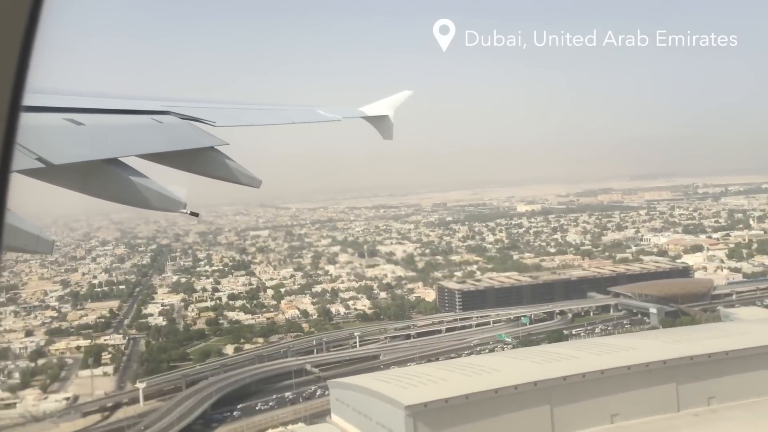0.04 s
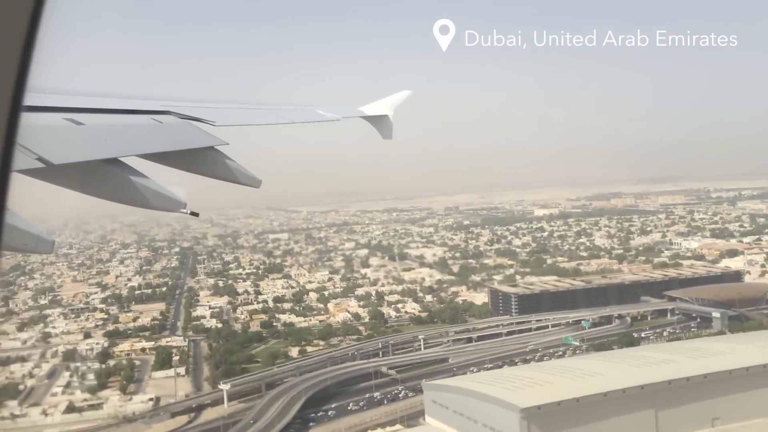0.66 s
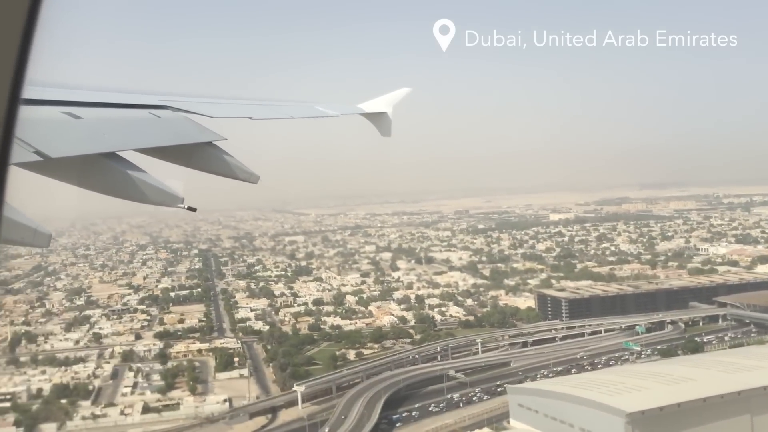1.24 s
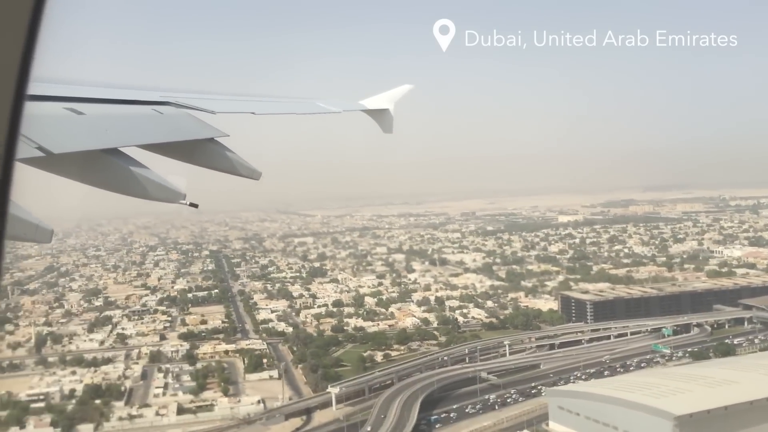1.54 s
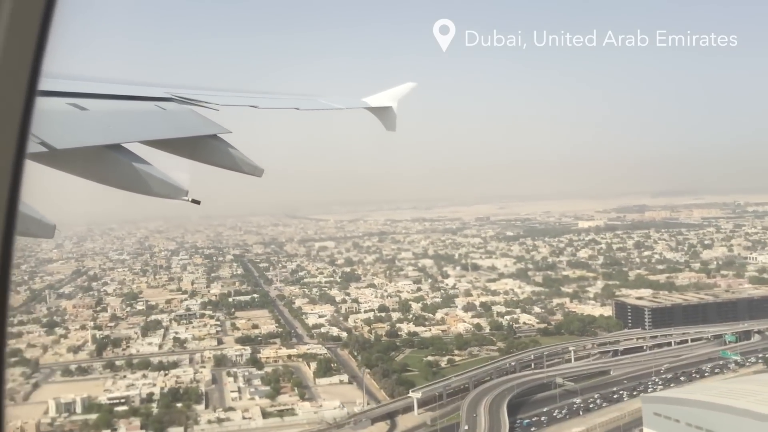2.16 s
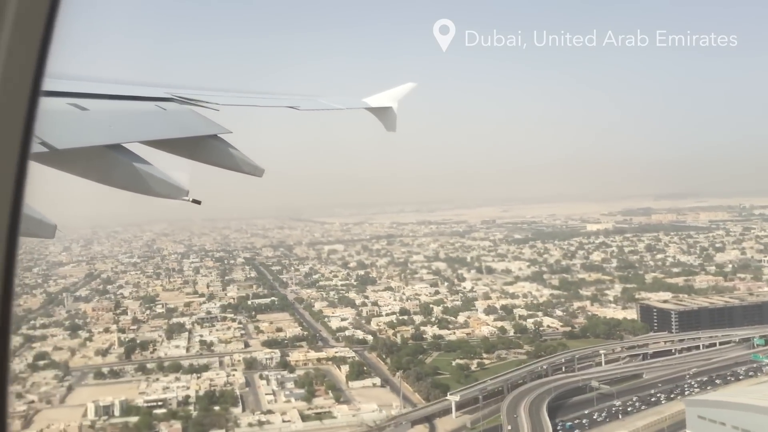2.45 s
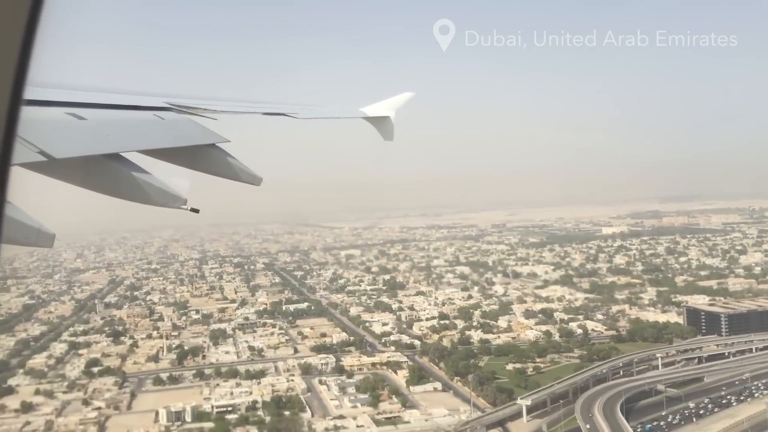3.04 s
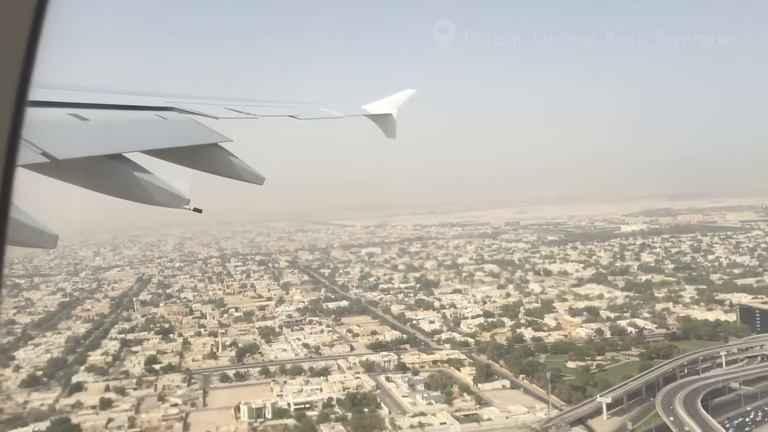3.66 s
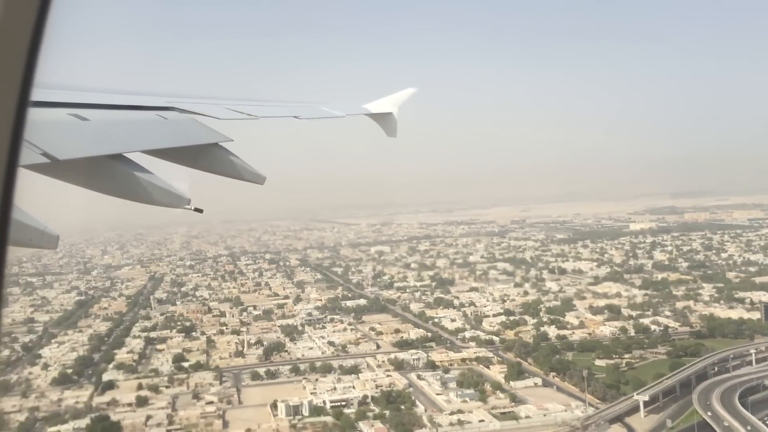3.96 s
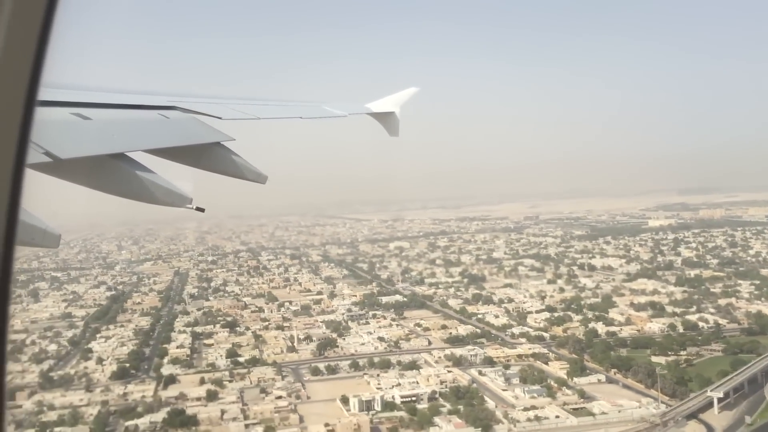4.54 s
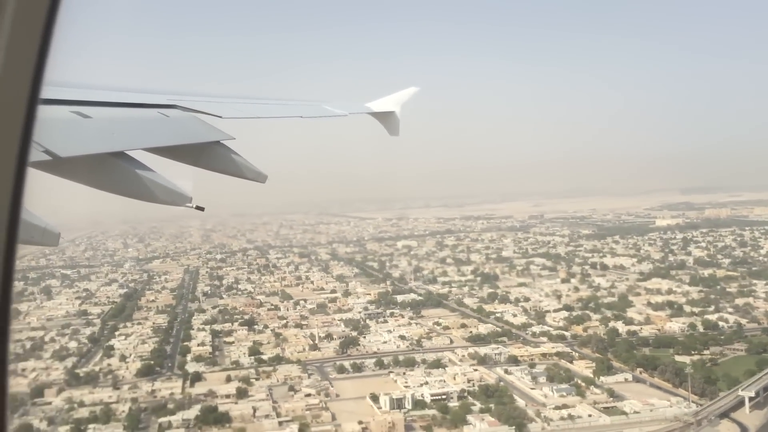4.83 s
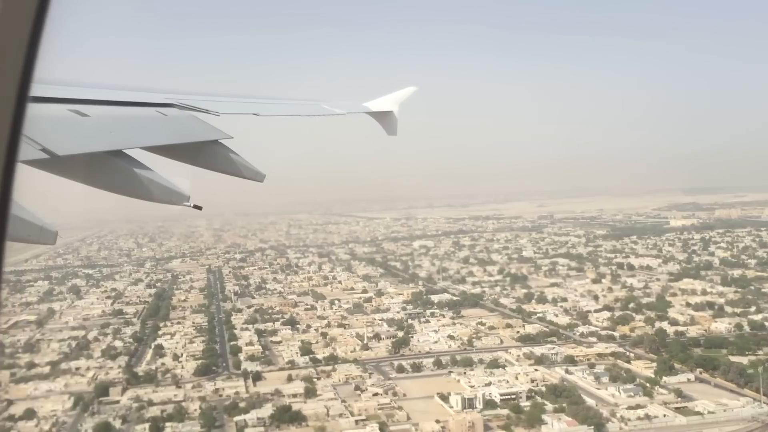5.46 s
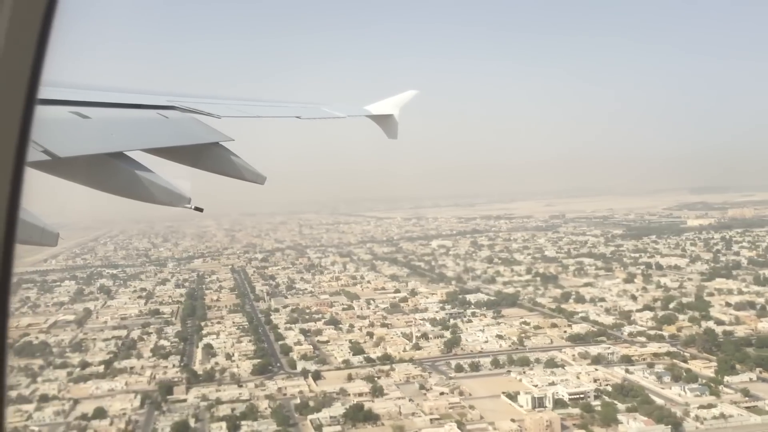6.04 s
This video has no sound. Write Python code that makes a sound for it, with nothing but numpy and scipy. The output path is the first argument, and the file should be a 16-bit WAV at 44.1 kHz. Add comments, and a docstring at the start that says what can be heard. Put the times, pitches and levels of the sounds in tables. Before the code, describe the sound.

Two heavy landing gear thuds, the second harder, break the low drone and soft airflow hiss inside a climbing airliner.

```python
"""Inside an airliner climbing away after take-off, at a window seat.
From the start, engines and airflow lay a bed of hull rumble and hiss under a faint wavering whine,
and a loose panel chirps as it rocks. Small things rustle; from 1.5 s, trim rattles and plastic
fittings knock. At 2.2 s the landing gear thuds below the floor and shakes the trim.
A second, harder thud lands at 4.8 s, and the whine pushes forward at the end."""
import sys
import numpy as np
from scipy import signal
from scipy.fft import rfft, irfft
from scipy.io import wavfile
from scipy.ndimage import uniform_filter1d

SR = 44100
rng = np.random.default_rng(int(sys.argv[2]) if len(sys.argv) > 2 else 0)


def transcribe(u):
    """Save the signal u as a 16-bit wav file named by the first command-line argument.

    u: samples, shape (n,) or (channels, n), limited to [-1, 1]; the rate is SR.
    q: integer samples, one column per channel.
    """
    v = np.clip(np.atleast_2d(u).T, -1, 1)
    q = np.round(v * 32767).astype(np.int16)
    wavfile.write(sys.argv[1], SR, q)


N = 277389
TIME = np.arange(N) / SR

# tone of the hull rumble: (frequency [Hz], relative level [dB])
RUMBLE_EQ = [(16, -28), (30, -21.5), (45, -8.5), (62, 0.5), (75, 2), (90, -0.5), (120, -6.5), (160, -8.5),
             (225, -11.5), (290, -21.5), (360, -25), (450, -38.5), (700, -83)]
# jolts of turbulence, each a short swell of the rumble: (time [s], length [s], lift [dB])
JOLTS = [(0.34, .1, 2), (1.017, 0.22, 1.5), (1.814, 0.023, 6), (2.13, .05, 4.5), (2.548, 0.085, 2.5),
         (3.377, 0.28, 1.5), (4.623, 0.046, 4), (5.47, 0.066, 3.5), (5.846, 0.046, 4.5)]
# tone of the rushing air: (frequency [Hz], relative level [dB])
AIR_EQ = [(250, -13.5), (480, 2.5), (720, -1), (1100, -10), (1650, -8), (2150, -17), (2700, -15.5),
          (3050, -25), (3750, -25.5), (4400, -33.5), (4900, -37.5), (6200, -36.5), (10500, -46),
          (12700, -47), (15200, -52.5)]
# path of the engine whine: (time [s], pitch [Hz], level [dB])
WHINE_PATH = [(0, 830, -66), (.4, 825.3, -61.5), (1.1, 835.3, -64), (1.8, 829, -59), (2.6, 832.7, -63.5),
              (3.7, 836, -62.5), (4.05, 825.6, -53.5), (4.27, 826, -65), (4.5, 817.6, -54.5),
              (5.1, 826, -63.5), (5.98, 831, -57.5), (6.12, 835, -53), (6.29, 832, -51.5)]
# faint machine hums: (pitch [Hz], level [dB])
MACHINE_TONES = [(101, -41), (1821, -73)]
# how hard and how high the loose panel squeals: (time [s], relative level [dB], pitch [Hz])
SQUEAL_PATH = [(.06, -69, 6380), (.38, -65.5, 6700), (0.701, -64, 6530), (.9, -65.5, 6880),
               (1.17, -74, 6700), (1.42, -61.5, 6490), (1.72, -67, 6320), (2.0, -63, 6600),
               (2.401, -72.5, 6600), (2.7, -65.5, 6530), (2.92, -66, 6350), (3.45, -68, 6230),
               (3.92, -66.5, 6480), (4.1, -75.5, 6960), (4.6, -78, 6720), (4.95, -64, 6380),
               (5.2, -72.5, 6650), (5.62, -65, 6380), (5.88, -71, 6450), (6.2, -81, 6760)]
# resonances of that panel: (frequency [Hz], relative level [dB])
PANEL_EQ = [(4500, -39), (5850, -17.5), (6060, 6), (6220, -10), (6380, -1), (6600, -3.5), (7000, -13),
            (9000, -39.5)]
# rustles and ticks: (time [s], length [s], relative level [dB], low edge [Hz], high edge [Hz])
RUSTLES = [(0.395, .0077, -70, 5550, 10040), (1.503, 0.047, -61, 4200, 4800),
           (1.835, .07, -57.5, 1800, 4600), (1.84, 0.061, -70.5, 6000, 15000), (2.01, .05, -60, 2200, 3970),
           (2.04, .05, -62, 4600, 7500), (2.376, .087, -70, 6300, 9000), (2.852, 0.085, -61, 3300, 4600),
           (3.653, .1, -67.5, 3660, 4900), (4.223, .014, -70, 5000, 10000)]
# rattles of the trim: (time [s], length [s], relative level [dB], tilt [dB/octave])
RATTLES = [(1.48, 0.052, -47, 2), (2.18, 0.094, -42, -0.3), (2.255, .035, -43.5, -2.5),
           (2.799, 0.06, -50, .7), (2.873, 0.026, -47, 0), (2.967, .014, -49, -0.5),
           (4.795, .066, -41.5, -.3), (4.875, 0.035, -44, -0.1)]
# tone of the trim: (frequency [Hz], relative level [dB])
TRIM_EQ = [(200, -15), (400, -1.5), (600, 5), (1000, -3), (1900, -2), (3200, -14), (5000, -25), (7000, -27),
           (10000, -39), (15000, -42.5)]
# light knocks of plastic fittings: (time [s], level [dB], pitch of the modes [ratio])
KNOCKS = [(1.502, -43.5, 1.01), (1.831, -40.5, 1.02), (1.998, -48.5, 1.05), (2.837, -53.5, 1.36),
          (2.876, -46, 1.45)]
# modes of the fittings: (frequency [Hz], relative level [dB], 60 dB decay time [s])
FITTING_MODES = [(1065, -0.5, 0.056), (1126, -4.5, .06), (1350, -6, 0.045), (1565, 0, .035),
                 (1744, 1, 0.035), (2090, -7.5, 0.025), (2280, -10, 0.048)]
# blows of the landing gear, five to a thud: (time [s], strength [dB], contact time [s])
GEAR_BLOWS = [(2.196, -15.5, 0.0034), (2.2102, -10.5, .0038), (2.217, -12, .0038), (2.2367, -10.5, 0.0032),
              (2.27, -19.5, 0.0065), (4.789, -16.5, .003), (4.8059, -8, 0.0037), (4.8468, -13.5, .0045),
              (4.868, -10.5, 0.0066), (4.9057, -18.5, 0.0077)]
# modes of the floor and hull: (frequency [Hz], relative level [dB], 60 dB decay time [s])
HULL_MODES = [(69, -24.5, .16), (85, -11, 0.27), (106.7, 2.5, 0.29), (130.4, 1, 0.16), (162.6, -9.5, 0.2),
              (215.7, -11.5, 0.23), (331, -14, 0.039)]


def amp(db):
    """Decibels to gain."""
    return 10 ** (np.asarray(db) / 20)


def unit(x):
    """Scales to rms 1."""
    return x / np.sqrt(np.mean(x ** 2) + 1e-20)


def add(mix, start_s, sound):
    """Drops a sound into the mix at its cue."""
    part = mix[max(round(start_s * SR), 0):][:len(sound)]
    part += sound[:len(part)]


def colour(x, eq, tilt_db=0):
    """Applies an EQ curve, tilted by tilt_db an octave, and scales to rms 1."""
    octave = np.log2(np.fft.rfftfreq(len(x), 1 / SR) + 1)
    hz, db = np.transpose(eq)
    gain = amp(np.interp(octave, np.log2(hz), db) + tilt_db * octave)
    return unit(irfft(rfft(x) * gain, len(x)))


def drift(rate_hz):
    """Slow random modulation of rms 1, rolling off around rate_hz."""
    hz = np.fft.rfftfreq(N, 1 / SR)
    return unit(irfft(rfft(rng.standard_normal(N)) * np.exp(-(hz / rate_hz) ** 2), N))


def tone(hz):
    """A sine of rms 1 that follows a pitch curve."""
    return unit(np.sin(2 * np.pi * np.cumsum(hz) / SR))


def crackle(samples, per_s):
    """Randomly scattered clicks of uneven size."""
    return rng.standard_normal(samples) * (rng.random(samples) < per_s / SR)


def grains(length_s, rise_share, tail_s):
    """A burst of tiny contacts, and the envelope that swells, holds and dies."""
    t = np.arange(int(length_s * SR) + SR // 6) / SR
    attack = np.minimum(t / (rise_share * length_s), 1)
    release = np.exp(-np.maximum(t - length_s * 0.83, 0) / tail_s)
    return crackle(len(t), per_s=5000), attack * release


def hull_rumble(level_db=-23):
    """Engines and turbulence shake the hull; the low end heaves with each jolt."""
    lift_db = sum(db * np.exp(-(2 * (TIME - at) / length) ** 2) for at, length, db in JOLTS)
    shake = colour(rng.standard_normal(N), RUMBLE_EQ)
    shake /= uniform_filter1d(shake ** 2, size=7000) ** .25  # 2:1 compression steadies the bed
    return amp(level_db + lift_db) * unit(shake)


def air_rush(air_db=-48.5, creak_db=-89.5):
    """Air streams over the skin and from the vents, with a faint creak of trim tucked inside."""
    air = colour(rng.standard_normal(N), AIR_EQ) * amp(0.95 * drift(20))
    specks = crackle(N, per_s=700)
    creak = colour(specks, [(1500, -20), (3500, 0), (8000, -3), (15000, -20)]) * amp(2.5 * drift(4))
    return amp(air_db) * air + amp(creak_db) * creak


def engine_whine():
    """The engine sings a thin, wavering note alongside two faint machine tones."""
    times, pitches, levels = np.transpose(WHINE_PATH)
    hz, db = np.interp(TIME, times, pitches), np.interp(TIME, times, levels)
    out = amp(db + 1.3 * drift(12)) * tone(hz + 4 * drift(20))
    for hz, db in MACHINE_TONES:
        out += amp(db + 2.5 * drift(4)) * tone(hz + 2.5 * drift(9))
    return out


def panel_chirps(first_s=.0465, swings_per_s=13.262, slowing_per_s2=.2351, waver_hz=85, rasp_depth=.45):
    """A loose panel rocks, gradually slowing, and squeals on each slide with a sagging pitch."""
    t, out = np.arange(-SR // 20, SR // 20) / SR, np.zeros(N)
    elapsed = TIME - first_s
    swing_count = np.floor(swings_per_s * elapsed - slowing_per_s2 * elapsed ** 2 / 2)
    times, levels, pitches = np.transpose(SQUEAL_PATH)
    for at in TIME[1:][np.diff(swing_count) > 0]:
        db = np.interp(at, times, levels) + 2.5 * rng.standard_normal()  # no two swings alike
        hz = np.interp(at, times, pitches) + 50 * rng.standard_normal()
        waver, rasp = (unit(uniform_filter1d(rng.standard_normal(len(t)), size=n)) for n in (70, 110))
        width_s, sag_hz_per_s, overtone_db = rng.uniform([.009, 0, -23], [.017, 4500, -12])
        phase = 2 * np.pi * np.cumsum(hz - sag_hz_per_s * t + waver_hz * waver) / SR
        envelope = np.exp(-(t / width_s) ** 2) + .12 * np.exp(-((t - .018) / .018) ** 2)  # peak, tail
        squeal = (1 + rasp_depth * rasp) * (np.sin(phase) + amp(overtone_db) * np.sin(2 * phase))
        add(out, at + t[0], amp(db) * envelope * squeal)
    ringing = colour(rng.standard_normal(N), PANEL_EQ) * amp(3 * drift(12))
    return amp(-1.5) * out + amp(-87) * ringing  # the panel rings faintly between chirps


def rustles():
    """Small things slide and tick about the cabin: fine, dry grains within a band."""
    out = np.zeros(N)
    for at, length, db, low_hz, high_hz in RUSTLES:
        clicks, envelope = grains(length, rise_share=0.3, tail_s=0.012)
        band = [(low_hz / 2, -30), (low_hz, 0), (high_hz, -6), (high_hz * 1.4, -30)]
        add(out, at, amp(db) * envelope * colour(clicks, band))
    return out


def trim_rattles():
    """Shaken panels chatter against their frames."""
    out = np.zeros(N)
    for at, length, db, tilt_db in RATTLES:
        clicks, envelope = grains(length, rise_share=0.29, tail_s=.031)
        add(out, at, amp(db) * envelope * colour(clicks, TRIM_EQ, tilt_db))
    return out


def fitting_knocks():
    """A quick scuff of contact rings a plastic part; smaller parts ring higher."""
    t, out = np.arange(SR // 5) / SR, np.zeros(N)
    for at, db, pitch in KNOCKS:
        ring = sum(amp(mode_db - 60 * t / t60) * np.sin(2 * np.pi * (hz * pitch * t + rng.random()))
                   for hz, mode_db, t60 in FITTING_MODES)
        scuff = colour(rng.standard_normal(len(t)), TRIM_EQ) * np.exp(-t / .008)
        knock = (ring + .5 * scuff) * np.minimum(t / .003, 1)  # 3 ms attack
        peak_rms = np.sqrt(uniform_filter1d(knock ** 2, size=400).max())
        add(out, at, amp(db) * knock / peak_rms)
    return out


def gear_thuds():
    """Each blow is a soft push that rings the hull; the shorter the contact, the brighter the thud."""
    t, force = np.arange(SR // 2) / SR, np.zeros(N)
    ring = sum(amp(db - 60 * t / t60) * np.sin(2 * np.pi * hz * t) for hz, db, t60 in HULL_MODES)
    for at, db, contact_s in GEAR_BLOWS:
        push = np.sin(np.pi * np.minimum(t / contact_s, 1)) ** 2
        add(force, at, amp(db) * push / push.sum())
    thuds = signal.oaconvolve(force, ring)[:N]
    low_cut = signal.butter(1, 45, "high", fs=SR, output="sos")  # slow pressure leaks away
    return signal.sosfilt(low_cut, thuds)


def cabin_reverb(x, t60_s=0.04, wet_to_dry_db=-5):
    """The padded cabin gives sudden sounds a short, tight tail."""
    t = np.arange(SR // 5) / SR
    reflections = crackle(len(t), per_s=2000) * (t > .002)  # 2 ms pre-delay
    tail = reflections * amp(-60 * t / t60_s)
    response = (t == 0) + amp(wet_to_dry_db) * tail / np.linalg.norm(tail)
    return signal.oaconvolve(x, response / np.linalg.norm(response))[:N]


def window_echo(x, delay_samples=41, strength=.22):
    """The pane beside the seat throws the sound back about a millisecond later."""
    return (x + strength * np.roll(x, delay_samples)) / np.hypot(1, strength)


def scene():
    """The mono mix at the seat: bass and whine come through the hull, the rest through the cabin air."""
    airborne = air_rush() + cabin_reverb(trim_rattles() + fitting_knocks() + rustles() + panel_chirps())
    through_hull = hull_rumble() + gear_thuds() + engine_whine()
    return (through_hull + window_echo(airborne))[None]


def record(dry, ceiling=.5, cutoff_hz=15300):
    """The hardest peaks overload the microphone and round off; then tiny end fades and a high cut."""
    soft_clipped = dry / (1 + (dry / ceiling) ** 8) ** (1 / 8)
    faded = soft_clipped * signal.windows.tukey(N, .001)
    high_cut = signal.firwin(511, cutoff_hz, window=("kaiser", 9), fs=SR)
    return signal.oaconvolve(faded, high_cut[None], "same")


dry = scene()
out = record(dry)
transcribe(out)
```